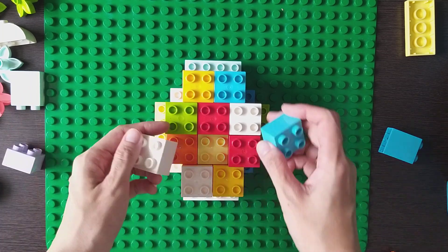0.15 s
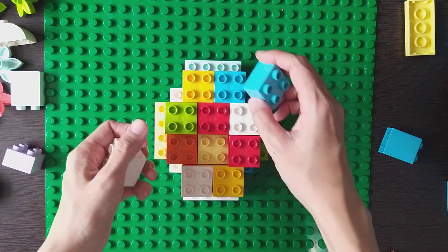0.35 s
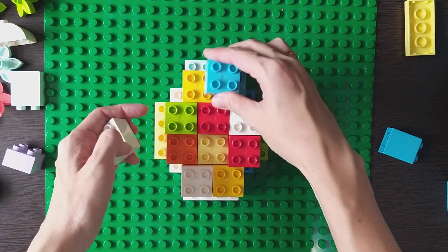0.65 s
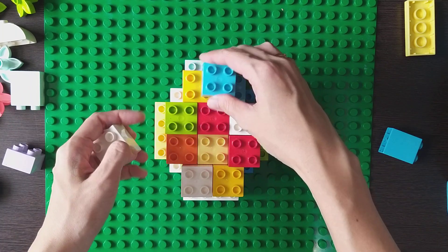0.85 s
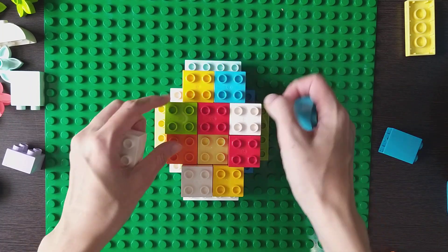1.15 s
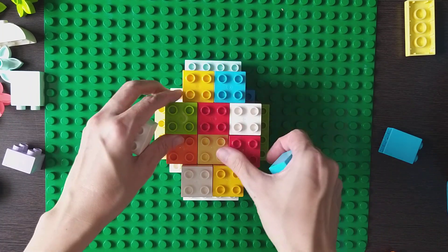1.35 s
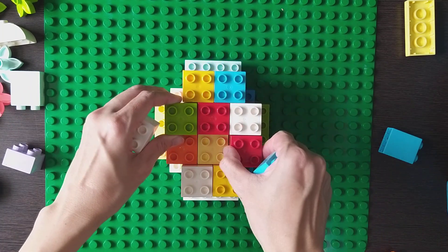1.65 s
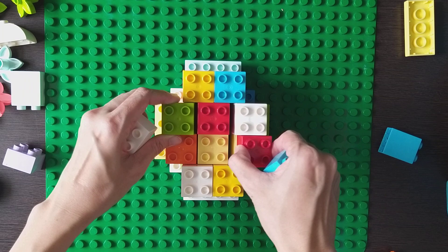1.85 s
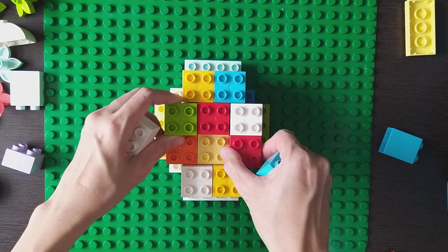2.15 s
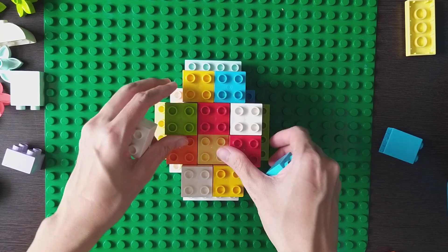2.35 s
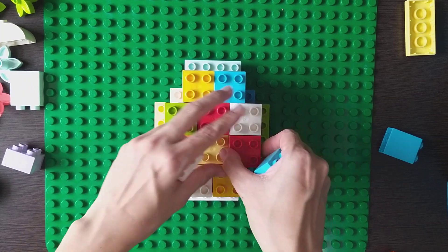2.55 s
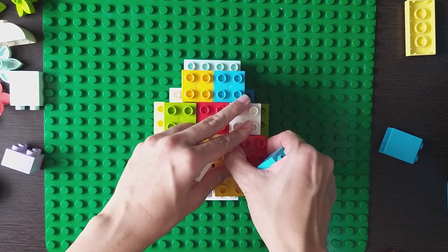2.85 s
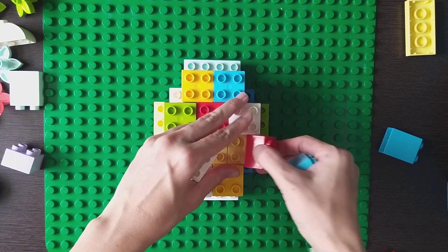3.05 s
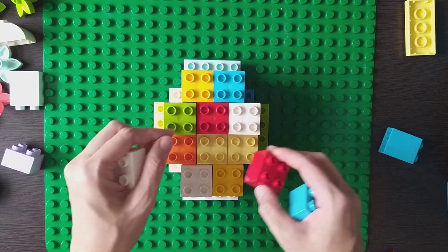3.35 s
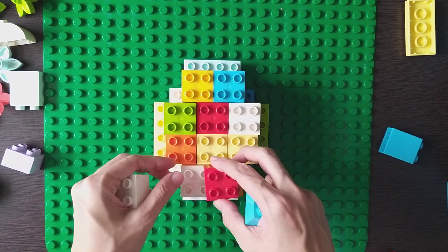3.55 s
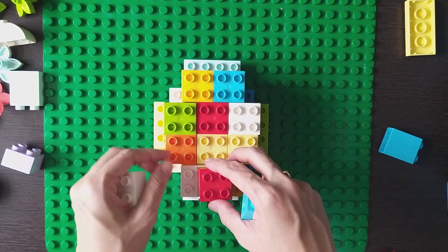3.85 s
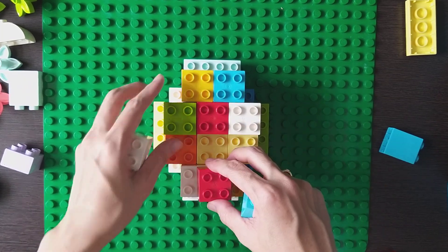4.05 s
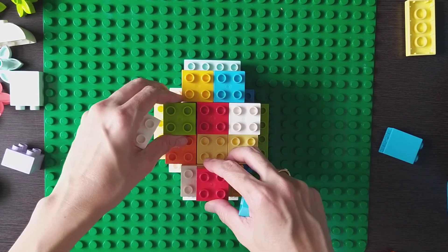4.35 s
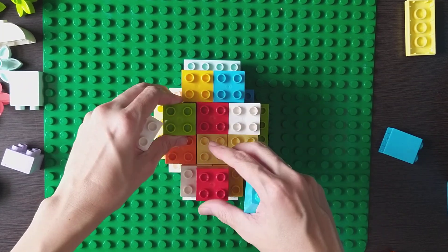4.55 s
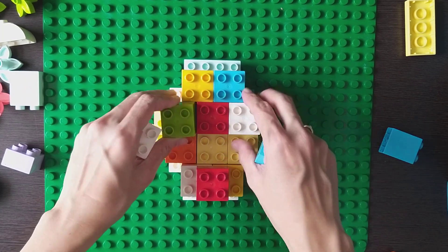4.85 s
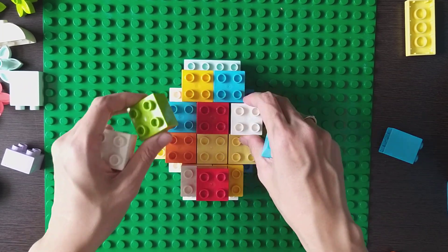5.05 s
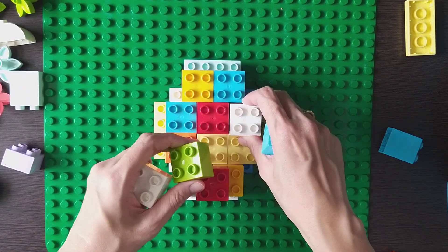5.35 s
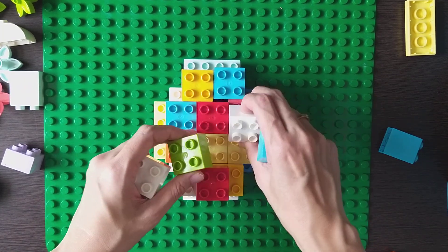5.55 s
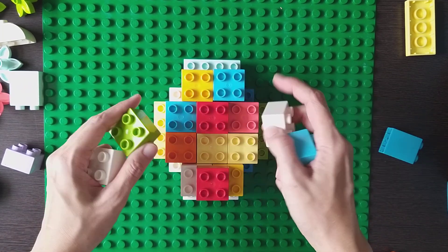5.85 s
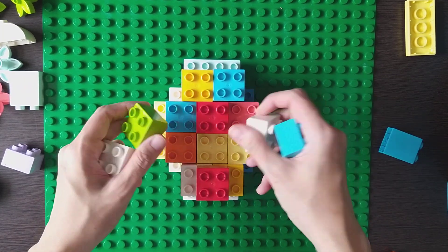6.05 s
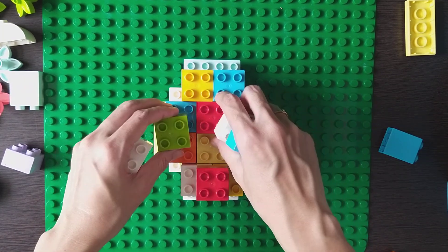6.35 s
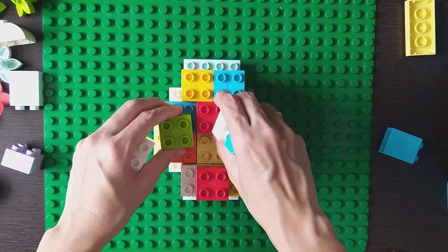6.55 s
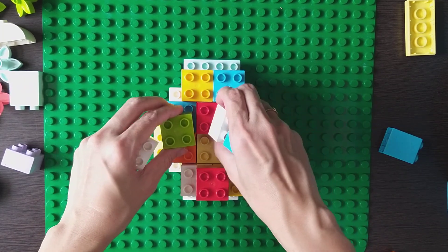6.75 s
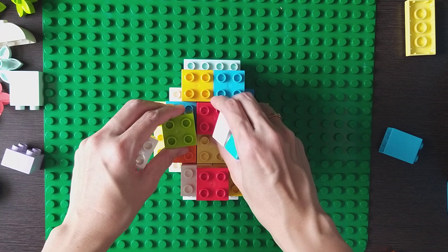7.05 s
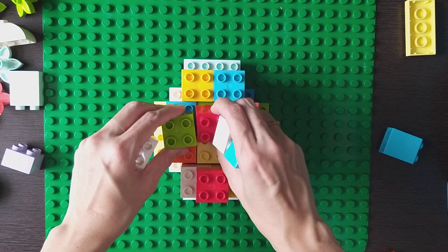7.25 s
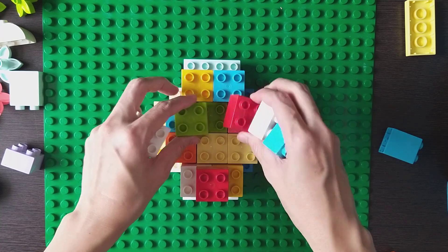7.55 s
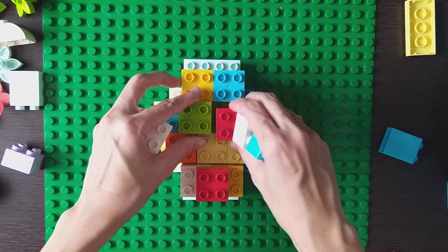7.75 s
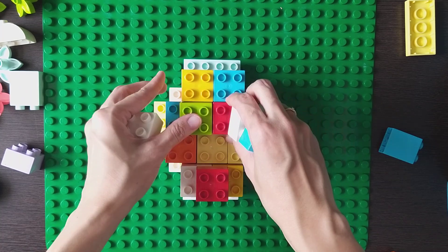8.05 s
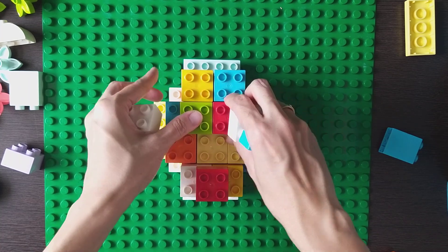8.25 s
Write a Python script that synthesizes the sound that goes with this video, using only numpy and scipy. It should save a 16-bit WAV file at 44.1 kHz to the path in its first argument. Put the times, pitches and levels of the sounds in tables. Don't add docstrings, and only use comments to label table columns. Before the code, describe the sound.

Close plastic brick handling in a small room: sharp clacks, cracking studs and dull plate knocks, loudest around six seconds, over low traffic drone.

```python
import sys
import numpy as np
from scipy import signal
from scipy.fft import rfft, irfft, next_fast_len
from scipy.io import wavfile

SR = 44100
rng = np.random.default_rng(int(sys.argv[2]) if len(sys.argv) > 2 else 0)


def inscribe(sig):
    pcm = np.round(np.clip(np.atleast_2d(sig).T, -1, 1) * 32767)
    wavfile.write(sys.argv[1], SR, pcm.astype(np.int16))


def field_ratio(decibels):
    return 10 ** (np.asarray(decibels, dtype=float) / 20)


N = 370881

# time_s, firing_hz, order1_db, order2_db, order3_db
LORRY_ORDERS = [
    (0.0, 57.8, -69, -68, -73),
    (0.09, 62.5, -63.5, -66, -72),
    (0.65, 62.8, -56.5, -52, -56),
    (1.39, 61.7, -57.5, -51, -61),
    (1.72, 60.5, -62, -69, -93),
    (2.12, 59.5, -56, -65, -57.5),
    (2.3, 64.9, -92, -85, -74),
]
# time_s, pitch_hz, level_db
CAR_TONE = [(1.8, 174.5, -83), (1.83, 178.5, -69), (2.13, 176.9, -49), (2.41, 173.1, -63),
            (2.61, 168.4, -51), (3.25, 169.0, -74.5), (3.79, 165.7, -58), (3.92, 163.7, -84.5),
            (4.56, 168.6, -45), (4.82, 180.3, -58), (5.02, 178.3, -46), (5.19, 178.9, -56),
            (6.18, 170.1, -64), (6.9, 172.6, -71), (6.93, 186.9, -67), (7.23, 160.4, -60),
            (7.34, 178.9, -57.5), (7.75, 179.7, -66.5), (8.17, 166.6, -69), (8.41, 178.1, -62)]
# time_s, level_db
STREET_LEVEL = [(0.0, -62.5), (0.14, -57), (0.56, -54), (0.86, -51.5), (1.29, -51.5), (1.69, -56.5),
                (1.9, -53.5), (2.08, -51.5), (2.53, -52), (2.76, -50.5), (3.09, -57), (3.3, -57),
                (3.72, -51.5), (3.98, -58), (4.22, -54), (4.61, -46.5), (4.97, -49.5), (5.17, -52),
                (5.72, -49), (5.9, -56), (6.42, -55.5), (6.74, -59.5), (7.07, -55.5), (8.1, -52),
                (8.41, -56)]
# freq_hz, density_db_per_hz
RUMBLE_SPECTRUM = [(12, -66.5), (20, -26.5), (32, -27), (48, -9.5), (138, -4.5), (172, -8), (191, -10.5),
                   (221, -21.5), (265, -21.5), (347, -24.5), (464, -27), (545, -36.5), (1500, -59.5),
                   (1950, -85), (3300, -120)]
# freq_hz, density_db_per_hz
HISS_SPECTRUM = [(470, -24.5), (800, -5), (1890, -9), (2370, -10.5), (2560, -7), (2900, -8), (6670, -10.5),
                 (15200, -13), (16400, -16)]
# freq_hz, t60_s, echo_db
ROOM_DECAY = [(100.9, 0.5, -4), (499.5, 0.41, -1), (1500, 0.33, 0), (4004, 0.37, -2), (9990, 0.34, -4.5)]
# time_s, left_minus_right_db
HAND_BALANCE = [(0.0, -6), (0.61, 6), (1.26, 2.5), (1.36, -6), (2.18, 7), (2.44, 5), (2.69, 4), (4.0, 2.5),
                (5.5, 5), (6.44, 1.5), (6.7, 2), (8.15, 4), (8.22, -5), (8.41, -3.0)]
# time_s, scrape_db
SLIDE_LEVELS = [
    [(0.0, -72.5), (0.15, -106)],
    [(2.05, -88), (2.2, -76)],
    [(2.6, -85), (2.704, -76), (2.986, -69.5), (3.1, -70)],
    [(4.85, -73.5), (4.92, -74), (5.108, -90.5), (5.408, -80), (5.45, -95)],
    [(6.5, -60.5), (6.606, -81.5), (6.844, -76), (7.004, -70.5), (7.43, -74.5), (7.632, -94), (7.754, -70),
     (8.174, -64.5), (8.244, -64), (8.41, -70)],
]
# freq_hz, density_db_per_hz
SCRAPE_SPECTRUM = [(290, -9), (500, -4.5), (704, -8), (1320, -14), (2760, -6.5), (3460, -17.5),
                   (4050, -4.5), (4940, -17.5), (6390, -15), (15000, -47)]
# start_s, peak_db, boom_hz, stud_re_peak_db, table_re_peak_db
PLATE_KNOCKS = [(0.657, -36, 302, 6, -15), (0.701, -42.5, 292, 14.5, -20), (0.743, -37.5, 550, -1, -12),
                (0.894, -38, 231, 3.5, -9), (1.125, -62, 202, -10, 1), (2.082, -51, 231, -3, -9),
                (2.122, -47, 365, -3, -6), (2.172, -27.5, 400, -5, -34), (2.194, -33, 378, -25, -10),
                (2.338, -47.5, 287, -14.5, -11), (2.704, -48, 240, -20, -15), (2.812, -28, 288, -16, -18),
                (2.827, -30, 350, -5, -6), (2.961, -53.5, 256, -16, -7), (3.077, -43, 235, -28, -21),
                (3.549, -48, 304, 15, -14), (3.635, -51, 215, 13, -10), (3.678, -40.5, 299, 10, -7),
                (3.803, -42, 208, -22, -10.5), (4.164, -48, 237, -8, 6.5), (4.729, -35, 240, 2.5, -17),
                (4.881, -51, 200, 7, 2), (4.953, -47.5, 200, -18, -8), (5.324, -43, 237, -17, -11),
                (5.527, -31.5, 220.6, -9, -12), (5.535, -29.5, 231, -9, -6), (5.625, -39, 268, -5, -8),
                (5.733, -59, 284, -9, -11), (5.844, -57, 202, 14, 0), (6.034, -44, 623, -2, -21),
                (6.19, -55, 560, 16.5, -11), (6.373, -44.5, 242, -3, -5), (6.397, -37, 234, 4.5, -27),
                (6.429, -40, 390, -13, -12), (6.449, -40.5, 235, 2, -20), (6.531, -40, 299, -16, -15),
                (6.659, -41, 234, -32, -18.5), (6.804, -43, 229.4, -33, -23), (6.859, -45, 344, -4, -6),
                (6.912, -48.5, 462, -17, 2.5), (7.028, -47, 229, -18, -17), (7.096, -45.5, 233, -6, -13),
                (7.144, -55, 250, -32, -2), (7.232, -32.5, 234, -18, -9), (7.268, -44, 273, -5, 3),
                (7.588, -38.5, 255, 5.5, -14), (7.611, -33.5, 249, 4.5, -18), (7.793, -34.5, 299, 4, -15.5),
                (7.848, -36, 285, -16, -9), (7.884, -39.5, 308, -2, -13), (8.028, -37.5, 242, 3.5, -5),
                (8.14, -33.5, 240, -3.5, -13), (8.158, -40, 247, -29, -14), (8.319, -49, 296, -5, -11.5),
                (8.345, -60, 202, 11.5, 9)]
# freq_hz, level_db, t60_s
PLATE_MODES = [(237.2, -14.5, .08), (284, -5.5, 0.088), (350, -7, 0.083), (418.8, -7, .06),
               (465, -10.5, .06), (547.6, -16.5, .05)]
# freq_hz, level_db, t60_s
STUD_MODES = [(640, -6.5, .015), (783, -7, .02), (941, -0.5, 0.012), (1157, -2.5, 0.021),
              (1400, -1.5, 0.019), (1590, 3.5, .015)]
# freq_hz, level_db, t60_s
TABLE_MODES = [(68, -8, .15), (100, 7, 0.33)]
# start_s, peak_db, stud_hz, brightness_re_peak_db
STUD_SNAPS = [(0.7033, -19, 2260, -22), (0.7432, -27, 1650, -19), (2.1204, -50, 1420, 0),
              (2.1705, -30, 1440, 2), (2.3374, -64, 1280, 2), (2.3574, -59, 1530, 4),
              (2.6954, -51.5, 1730, -2), (2.8105, -24, 1770, -12), (2.8204, -26, 1760, 0),
              (2.9562, -48.5, 1500, -22), (3.678, -22.5, 1790, -27.5), (4.7257, -29, 1555, -5),
              (4.7334, -40, 1820, -11), (4.8838, -44.5, 1500, -18), (5.2954, -66, 1640, -6),
              (5.3233, -52, 1880, -19), (5.5368, -17.5, 1990, -6), (5.6201, -24.5, 2160, -3.5),
              (5.7299, -42, 1760, -17), (6.4504, -30.5, 1570, -6), (7.2335, -38.5, 1880, -20),
              (7.6134, -19, 1860, -12.5), (7.7932, -23, 1850, -16), (7.8484, -32, 1820, -17),
              (7.8784, -38, 1440, 2), (7.9119, -36.5, 1780, -19), (7.9444, -49, 1630, -12),
              (8.0254, -31.5, 2140, -4), (8.1409, -38, 1400, -12), (5.528, -31, 1870, 1)]
# freq_hz, density_db_per_hz
CRACK_SPECTRUM = [(530, -33), (900, -4), (1390, -14), (1790, 0), (2760, -6), (6330, -10.5), (8350, -19.5),
                  (14500, -26.5), (16000, -32)]
# start_s, peak_db, cavity_hz, wall_hz, wall_re_peak_db, edge_re_peak_db
BRICK_CLACKS = [(0.6591, -29.5, 2500, 3800, -2.5, -11.5), (0.7036, -18.5, 2740, 3850, -8, -23),
                (0.7251, -30, 2650, 3970, -13.5, -18), (0.7444, -26.5, 2720, 3800, -11.5, -37),
                (0.7567, -32, 2660, 4060, -9.5, -34), (0.8883, -26, 2630, 4286, -4.5, -11),
                (1.1257, -22.5, 3010, 3680, -17.5, -54), (2.1455, -52, 2460, 4220, 3.5, 2.5),
                (3.0705, -45.5, 3110, 4700, 4.5, -4), (3.5486, -29, 2835, 3540, -24.5, -40.5),
                (3.6106, -39, 2930, 3530, -13, -41), (3.6341, -36, 2970, 3680, -22, -32),
                (3.679, -25, 2420, 3660, -20.5, -37), (4.149, -65.5, 2490, 4610, -9.5, -5.5),
                (4.1609, -54.5, 2250, 4510, -4.5, -22), (5.5368, -22.5, 2066, 4220, -17, -10.5),
                (5.6203, -24, 2040, 3315, -14.5, -13.5), (5.8321, -14.5, 2664, 3863, -9, -13),
                (6.0369, -9.5, 2466, 3750, -10.5, -22), (6.0554, -21.5, 2300, 4180, 1, -26.5),
                (6.1924, -5.5, 2778, 3985, -10.5, -18), (6.3436, -25.5, 2650, 3770, -7.5, -25),
                (6.355, -15, 2670, 3840, -22, -38), (6.3875, -21.5, 2565, 3800, -12, -41.5),
                (6.4315, -21.5, 2720, 3530, -10.5, -17), (6.4467, -25.5, 2770, 3770, -11, -19),
                (6.5284, -44.5, 2710, 4400, -0.5, -20), (6.6637, -48.5, 2330, 3550, -11.5, -33.5),
                (6.786, -50.5, 2664, 3960, -28, -36), (6.8002, -38.5, 2525, 3270, -11, -17),
                (6.8488, -40.5, 2650, 4730, -21, -13.5), (6.8614, -47, 2850, 4000, -10.5, -17),
                (6.935, -52, 2780, 3880, -25, -27), (6.9666, -46.5, 2340, 3850, -36, -29.5),
                (7.0266, -35.5, 2593, 3880, -37, -26), (7.0946, -34, 2480, 4370, -14.5, -42),
                (7.245, -36.5, 2380, 4100, -13, -36), (7.3489, -37.5, 2790, 3770, -16, -12.5),
                (7.3711, -33.5, 3010, 3720, -15.5, -15.5), (7.3965, -40.5, 2990, 3880, -26, -22.5),
                (7.5271, -47, 2820, 3850, -11, -9), (7.5839, -18.5, 2740, 3770, -15, -36),
                (7.6006, -24, 2370, 3880, -16, -19), (7.6065, -21.5, 2670, 3840, -11.5, -21),
                (7.7996, -26.5, 2640, 3760, -13.5, -28.5), (7.8372, -33.5, 2630, 3990, -5.5, -15),
                (8.0006, -43.5, 2730, 5070, -9, -17), (8.023, -35, 2780, 4060, -1, -7.5),
                (8.3427, -36.5, 2840, 4080, -10, -22), (8.3462, -24.5, 2630, 3960, -32, -32.5)]
PARTNER_CLACKS = [
    (1.1262, -33.5, 2461, 3950, -6, -41),
    (3.6778, -30.5, 2960, 3730, -12.5, -38),
    (5.847, -27.5, 2660, 4040, -9.5, -13.5),
    (6.0285, -25, 2650, 4630, -5.5, -10.5),
    (6.1908, -25.5, 2430, 3060, -5.5, -21),
    (7.073, -58, 2520, 4530, -6, -18),
]
# cavity_multiple, level_db, t60_s
CAVITY_MODES = [(.89, -27.5, 0.04), (1, 1, .035), (1.06, -6.5, 0.014), (1.13, -10.5, .02)]
# wall_multiple, level_db, t60_s
WALL_MODES = [(.8, -5.5, 0.019), (0.881, -1, 0.016), (1.001, 6, 0.063), (1.05, -7, .025),
              (1.15, -12, 0.029), (1.25, -19, 0.027)]
# freq_hz, level_db, t60_s
EDGE_MODES = [(5420, -1.5, 0.035), (5907, 5, 0.024), (6320, 2, .01), (6550, -1, .015), (7600, -6, .008),
              (8370, 4.5, .015), (8860, -17.5, 0.0046), (10300, -18.5, 0.0087), (11160, -10.5, 0.011),
              (12350, -13.5, 0.0073), (13500, -12, .006), (14400, -17.5, .006)]


def at_hz(points, hz):
    p = np.array(points)
    return np.interp(np.log(np.maximum(hz, 1)), np.log(p[:, 0]), p[:, 1])


def in_time(rows, fade_s=0.042):
    time_s, *columns = np.transpose(rows)
    t = np.arange(N) / SR
    gate = np.clip(np.minimum(t - time_s[0] + fade_s, time_s[-1] + fade_s - t) / fade_s, 0, 1)
    return [np.interp(t, time_s, c) for c in columns] + [gate]


def rms_one(x):
    return x / np.sqrt(np.mean(x ** 2) + 1e-20)


def coloured(white, spectrum):
    size = next_fast_len(N)
    hz = np.arange(size // 2 + 1) * SR / size
    shaped = rfft(white, size) * field_ratio(at_hz(spectrum, hz))
    return rms_one(irfft(shaped, size)[..., :N])


def stereo_noise(alike):
    mid, side = rng.standard_normal((2, N))
    alike = np.clip(alike, 0, 1)
    return np.sqrt(1 + alike) * mid + np.sqrt(1 - alike) * side * np.array([[1], [-1]])


def struck(push, modes, chance, spread_db, detune):
    out = np.zeros(len(push))
    for (hz, level_db, t60_s), (a, b) in zip(modes, chance):
        r = field_ratio(-60 / (t60_s * SR))
        w = 2 * np.pi * hz * (1 + detune * b) / SR
        ring = signal.lfilter([0, 1], [1, -2 * r * np.cos(w), r * r], push)
        out += field_ratio(level_db + spread_db * a) * ring / np.max(np.abs(ring))
    return out / np.max(np.abs(out))


def contact(noise, length_s, chatter_s):
    push = np.full(int(length_s * SR), 1e-18)
    t = np.arange(len(noise)) / SR
    push[:len(noise)] += noise * np.abs(noise) * np.exp(-t / chatter_s)
    return push


def add(track, sound, start_s):
    i = round(start_s * SR)
    track[..., i:i + sound.shape[-1]] += sound[..., :N - i]


def hiss():
    return field_ratio(-76) * coloured(stereo_noise(alike=0.16), HISS_SPECTRUM)


def traffic():
    firing_hz, *orders_db, gate = in_time(LORRY_ORDERS)
    phase = 2 * np.pi * np.cumsum(firing_hz) / SR
    lorry = gate * sum(field_ratio(db) * np.sin((k + 1) * phase + k) for k, db in enumerate(orders_db))
    car_hz, car_db, gate = in_time(CAR_TONE)
    car = gate * field_ratio(car_db) * np.sin(2 * np.pi * np.cumsum(car_hz) / SR)
    rumble = field_ratio(in_time(STREET_LEVEL)[0] - 4.2) * coloured(stereo_noise(alike=0.89), RUMBLE_SPECTRUM)
    return lorry + car + rumble * field_ratio([[.6], [-.6]])


def room(x, gap_s=0.0045, build_s=0.0086):
    t = np.arange(int(.6 * SR)) / SR
    white = rng.standard_normal((2, len(t)))
    edges_hz = 60 * 2. ** np.arange(9)
    table = np.array(ROOM_DECAY)
    tail = 0
    for lo, hi in zip(edges_hz, edges_hz[1:]):
        centre_hz = np.sqrt(lo * hi)
        t60_s, echo_db = at_hz(table, centre_hz), at_hz(table[:, ::2], centre_hz)
        octave = signal.butter(2, [lo, hi], "band", fs=SR, output="sos")
        mid, side = signal.sosfilt(octave, white)
        pair = mid + np.tanh(lo / 400) * side * np.array([[1], [-1]])
        tail = tail + pair * field_ratio(echo_db - 60 * t / t60_s)
    tail = tail * np.clip((t - gap_s) / build_s, 0, 1) * field_ratio(-26.5)
    return signal.fftconvolve(x[None], tail, axes=1)[:, :N]


def sliding():
    hits = rng.random(N) < 1500 / SR
    sizes = field_ratio(3.0 * np.minimum(rng.exponential(1, N), 4))
    grains = hits * sizes * rng.choice([-1, 1], N)
    level = sum(field_ratio(db) * gate for db, gate in map(in_time, SLIDE_LEVELS))
    return field_ratio(2.0) * level * coloured(grains, SCRAPE_SPECTRUM)


def knocks():
    out = np.zeros(N)
    draws = rng.standard_normal((len(PLATE_KNOCKS), 700))
    for (start_s, peak_db, boom_hz, stud_db, table_db), d in zip(PLATE_KNOCKS, draws):
        push = contact(d[60:], .25, chatter_s=.004)
        chance = d[:60].reshape(-1, 2)
        boom = struck(push, [(boom_hz, 0, .07)] + PLATE_MODES, chance, spread_db=2, detune=.01)
        studs = struck(push, STUD_MODES, chance[8:], spread_db=2, detune=.05)
        table = struck(push, TABLE_MODES, chance[16:], spread_db=1, detune=.02)
        hit = boom + field_ratio(stud_db - 1.5) * studs + field_ratio(table_db - 0.5) * table
        add(out, field_ratio(peak_db + 1.5) * hit, start_s)
    return signal.sosfilt(signal.butter(3, [55, 1900], "band", fs=SR, output="sos"), out)


def snaps():
    out = np.zeros(N)
    draws = rng.standard_normal((len(STUD_SNAPS), 1024))
    size, lead = 2048, 64
    band_hz = np.arange(size // 2 + 1) * SR / size
    for (start_s, peak_db, stud_hz, bright_db), d in zip(STUD_SNAPS, draws):
        push = np.roll(contact(d, size / SR, chatter_s=0.006), lead)
        tilt_db = (bright_db + 9.5) * np.clip(np.log2(band_hz / 2500 + 1e-9), 0, 1)
        crack = irfft(rfft(push) * field_ratio(at_hz(CRACK_SPECTRUM, band_hz) + tilt_db))
        stud = struck(push, [(stud_hz, 0, .015)], [(0, 0)], spread_db=0, detune=0)
        hit = crack / np.max(np.abs(crack)) + field_ratio(-10.0) * stud
        add(out, field_ratio(peak_db - 0.5) * hit, start_s - lead / SR)
    return out


def clacks():
    out = np.zeros(N)
    events = BRICK_CLACKS + PARTNER_CLACKS
    draws = rng.standard_normal((len(events), 500))
    for (start_s, peak_db, cavity_hz, wall_hz, wall_db, edge_db), d in zip(events, draws):
        push = contact(d[60:], 0.05, chatter_s=0.0017)
        chance = d[:60].reshape(-1, 2)
        cavity_modes = [(m * cavity_hz, db, t60_s) for m, db, t60_s in CAVITY_MODES]
        wall_modes = [(m * wall_hz, db, t60_s) for m, db, t60_s in WALL_MODES]
        cavity = struck(push, cavity_modes, chance, spread_db=2, detune=.004)
        walls = struck(push, wall_modes, chance[5:], spread_db=2, detune=.006)
        edges = struck(push, EDGE_MODES, chance[12:], spread_db=2, detune=.015)
        hit = cavity + field_ratio(wall_db + 5.5) * walls + field_ratio(edge_db + 6.5) * edges
        small_body = signal.butter(4, 0.84 * cavity_hz, "high", fs=SR, output="sos")
        add(out, field_ratio(peak_db + 1.69) * signal.sosfilt(small_body, hit), start_s)
    return out


def scene():
    bricks, plate = clacks() + snaps() + sliding(), knocks()
    balance = np.array([[.5], [-.5]]) * in_time(HAND_BALANCE)[0]
    near = bricks * field_ratio(balance) + plate * field_ratio([[.8], [-.8]])
    near[1] = np.roll(near[1], 1)
    return near + room(bricks + plate) + traffic()


def band_limit(x):
    return signal.sosfilt(signal.butter(12, 16510, fs=SR, output="sos"), x)


def record(dry):
    mix = dry + hiss()
    return band_limit(mix)


dry = scene()
out = record(dry)
inscribe(out)
```